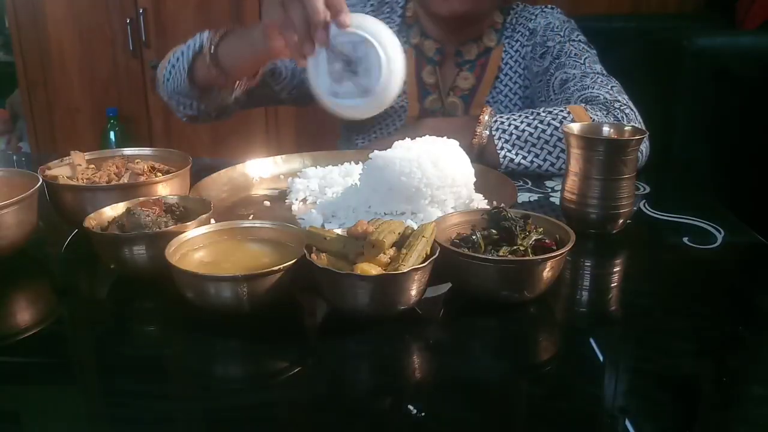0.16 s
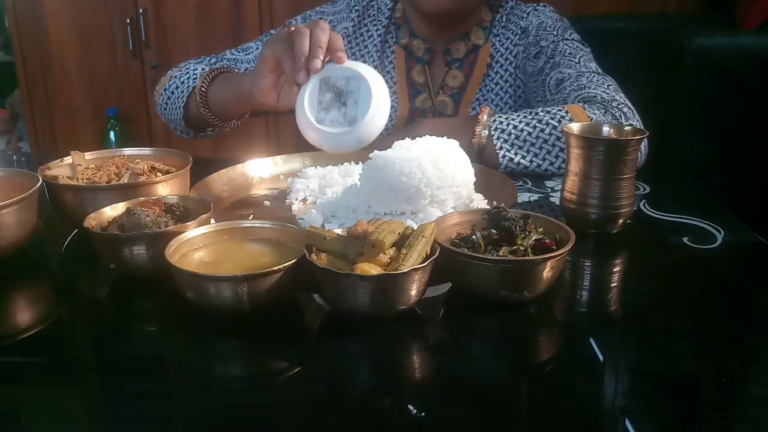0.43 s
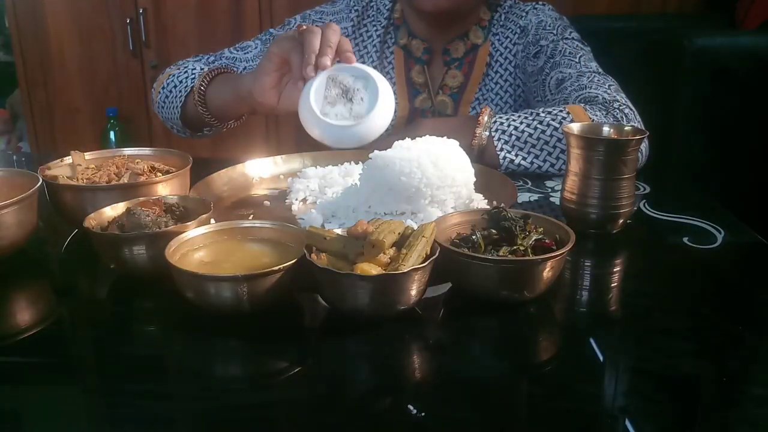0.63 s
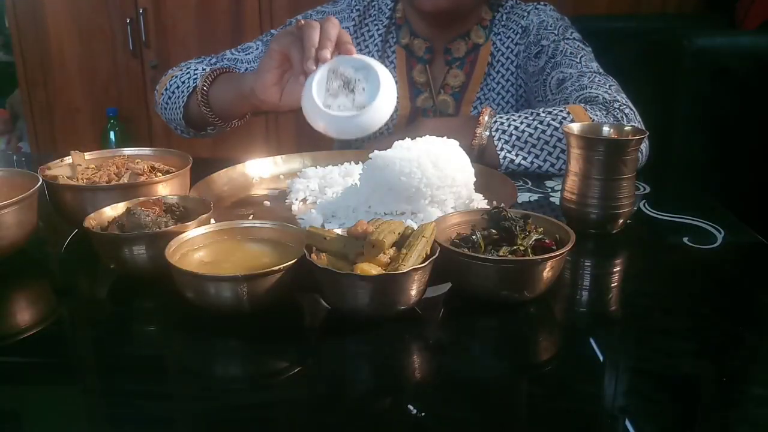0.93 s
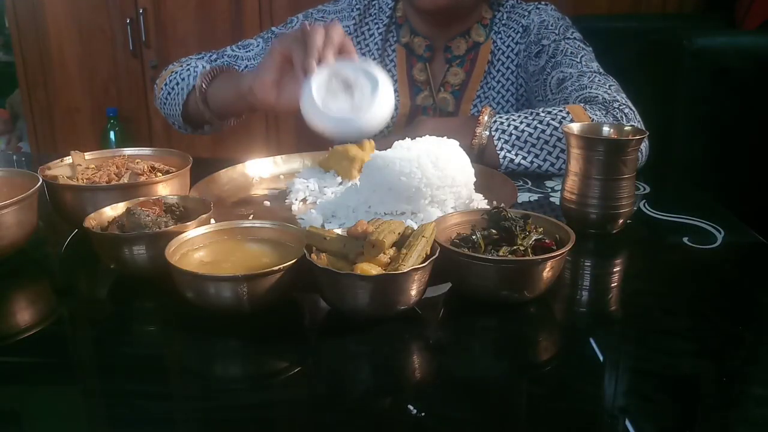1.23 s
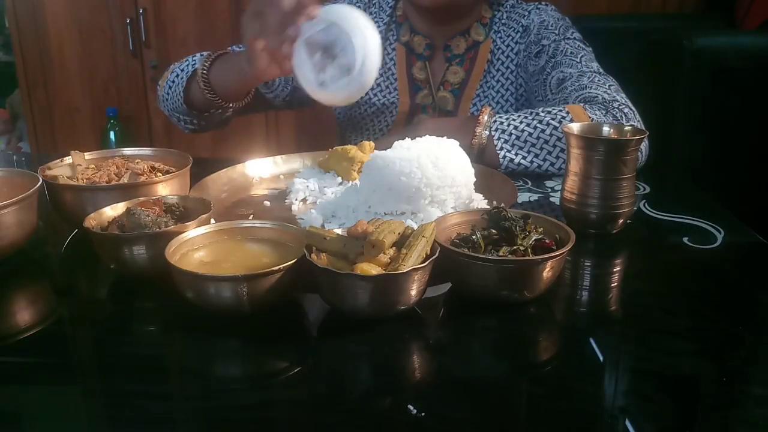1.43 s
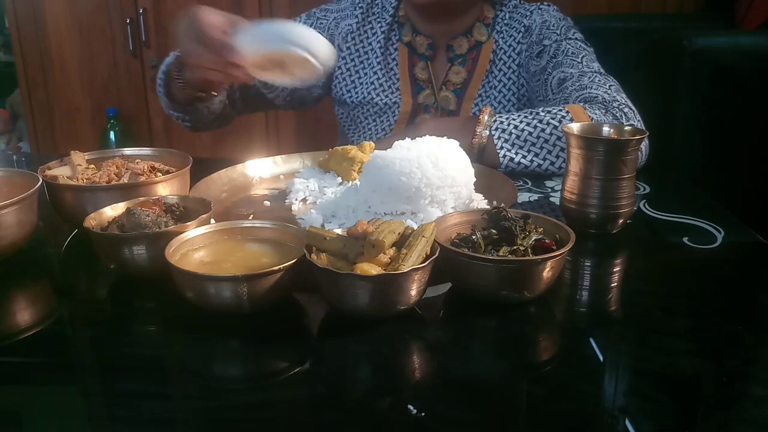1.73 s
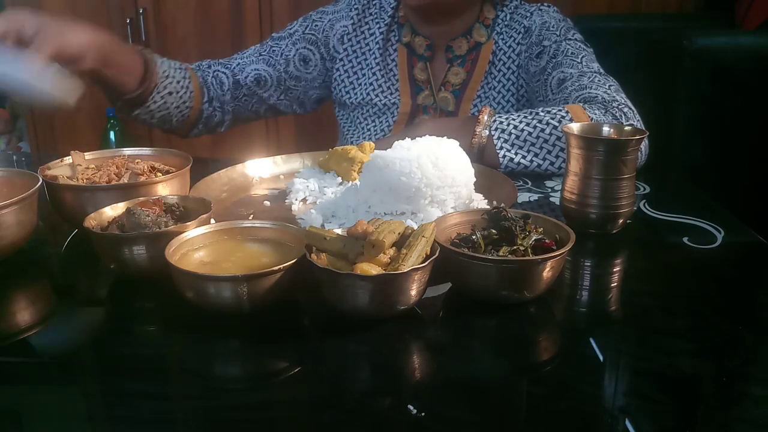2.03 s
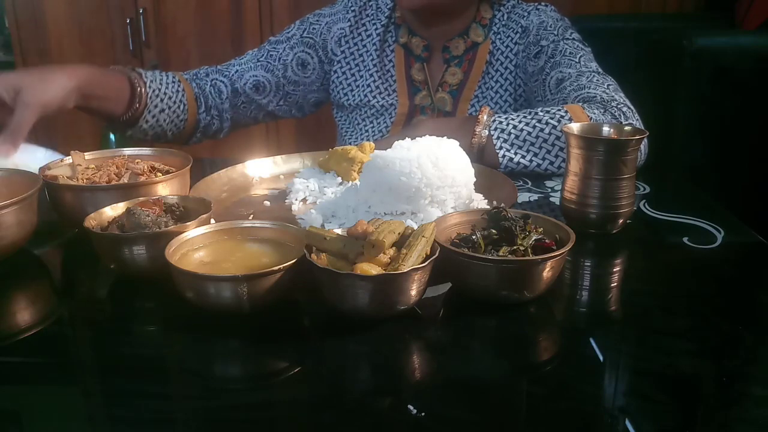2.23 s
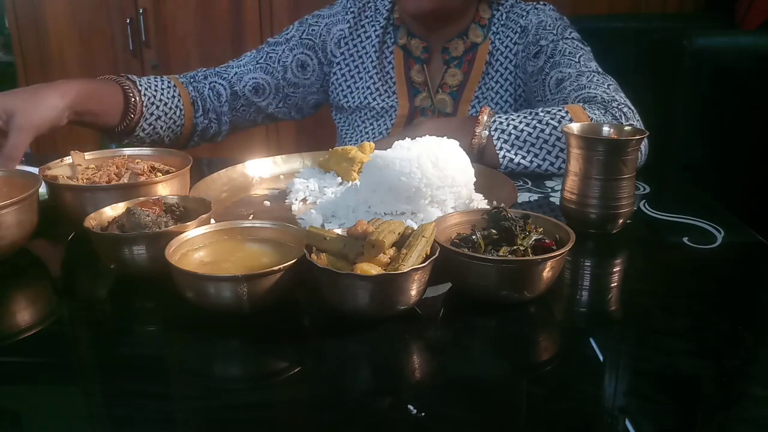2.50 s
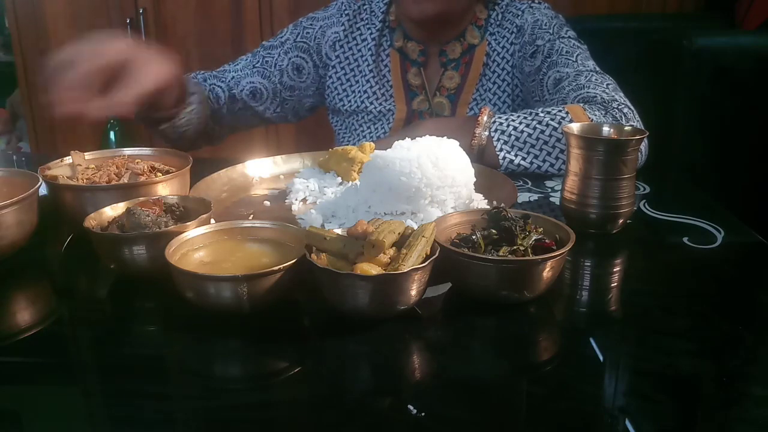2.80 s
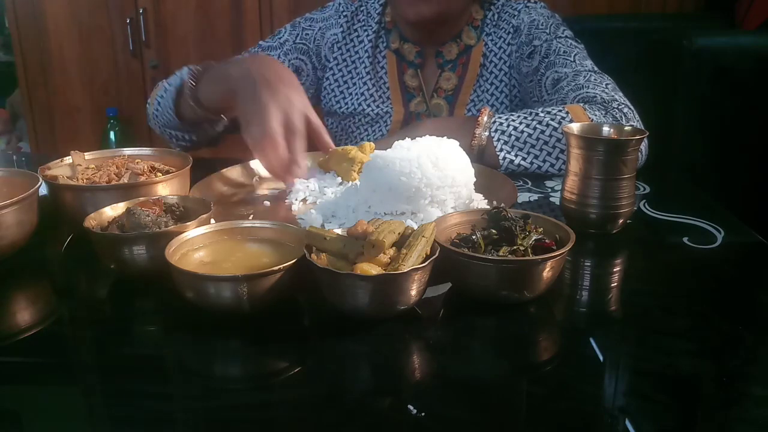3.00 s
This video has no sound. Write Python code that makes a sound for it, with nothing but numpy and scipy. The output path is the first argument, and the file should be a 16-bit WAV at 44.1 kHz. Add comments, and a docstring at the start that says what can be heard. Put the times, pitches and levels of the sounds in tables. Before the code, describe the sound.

A dish clinks on a metal bowl and clatters down, following the faint swishes, bumps and dull tap of food served by hand. A small, faintly humming room adds a short echo; the clatter distorts the microphone.

```python
"""An emptied dish clinks against a metal bowl, then clatters down among the bowls:
each hit is a sharp crack followed by a metallic ring. Before that, food is served by hand,
with soft swishes, low bumps on the table and a lump dropping dully on a metal plate.
The small, hard-walled room hums and adds a short echo. The clatter overloads the
microphone, whose gain control turns the sound down and recovers slowly."""
import sys
import numpy as np
from scipy import signal
from scipy.fft import rfft, irfft, next_fast_len
from scipy.io import wavfile
from scipy.ndimage import uniform_filter1d

SR = 44100
rng = np.random.default_rng(int(sys.argv[2]) if len(sys.argv) > 2 else 0)


def store_wav(level_fs):
    """Save 16-bit WAV to argv[1]."""
    pcm = np.round(np.clip(np.atleast_2d(level_fs), -1, 1) * 32767)
    wavfile.write(sys.argv[1], SR, pcm.T.astype(np.int16))


N = 138915
TIME = np.arange(N) / SR


def from_db(db):
    """Turn decibels into a number to multiply by."""
    return 10 ** (np.asarray(db) / 20)


def fade(t, fade_s):
    """A dying curve; the fade time is how long it takes to fall by 60 dB."""
    return np.exp(-np.log(1000) * t / fade_s)


def butter(order, hz, kind):
    """A filter that keeps the "low" part, the "high" part or a middle "band"."""
    return signal.butter(order, hz, kind, fs=SR, output="sos")


def at_hz(points, hz):
    """Read between a table's rows, giving every octave equal space."""
    row_hz, value = np.transpose(points)
    return np.interp(np.log(np.maximum(hz, 1)), np.log(row_hz), value)


def colour_gain(colour, size):
    """How strong each frequency is in a sound's colour, falling away past the table's ends."""
    hz = np.maximum(np.fft.rfftfreq(size, 1 / SR), 1)
    ends = np.minimum(hz / colour[0][0], 1) * np.minimum(colour[-1][0] / hz, 1)
    return from_db(at_hz(colour, hz)) * ends ** 2


def noise(colour):
    """Noise of the given colour, with an average power of 1."""
    size = next_fast_len(N)
    shaped = irfft(rfft(rng.standard_normal(size)) * colour_gain(colour, size), size)[:N]
    return shaped / np.sqrt(np.mean(shaped ** 2) + 1e-20)


def shortest_click(colour, size=4096):
    """The shortest click that has this colour."""
    cepstrum = irfft(np.log(colour_gain(colour, size) + 1e-9))
    half = size // 2
    cepstrum[1:half] *= 2   # folding the second half onto the first packs the energy at the start
    cepstrum[half + 1:] = 0
    click = irfft(np.exp(rfft(cepstrum)))[:half]
    return click / np.linalg.norm(click)


def through(x, response):
    """Pass a sound through something, given that thing's answer to one click."""
    return signal.fftconvolve(x, response)[:N]


def ring(hits, tones):
    """Every hit adds energy to each of an object's own tones, which then die away."""
    first = int(hits[0][0] * SR)
    t = TIME[:min(SR, N - first)]
    out = np.zeros(N)
    for hz, tone_db, fade_s in tones:
        energy = np.zeros(len(t))
        for start_s, hit_db, *_ in hits:
            lag = int(start_s * SR) - first
            energy[lag:] += (from_db(hit_db + tone_db) * fade(t[:len(t) - lag], fade_s)) ** 2
        out[first:first + len(t)] += rng.choice([-1, 1]) * np.sqrt(energy) * np.sin(2 * np.pi * hz * t)
    return out


# The colour of the room's noise. Each row: frequency in Hz, relative level in dB.
AIR_COLOUR = [(15, -43.5), (25, -14), (102, -2.5), (129, 0.5), (174, -7.5), (299, -11), (333, -13),
              (447, -18.5), (540, -11), (586, -14.5), (809, -17), (926, -18), (1390, -25.5), (2140, -33),
              (2870, -30.5), (9410, -45), (15700, -42.5)]
# The shape of its middle range's drift. Each row: time in seconds, level in dB before scaling.
MIDRANGE_DRIFT = [(0, -60.5), (.25, -60), (.62, -55.5), (.86, -59), (1.0, -56), (1.2, -54), (1.52, -62),
                  (1.68, -58), (2.15, -61), (2.36, -64)]

def room_noise(level_db=-51.5, drift_share=0.69):
    """Rumble and hiss whose middle range slowly rises and falls."""
    air = from_db(level_db) * noise(AIR_COLOUR)
    middle = signal.sosfiltfilt(butter(2, [460, 1500], "band"), air)
    drift_db = np.interp(TIME, *np.transpose(MIDRANGE_DRIFT))
    middle_gain = from_db(drift_share * (drift_db - np.median(drift_db)))
    return air + middle * (middle_gain - 1)


# The humming tones. Each row: pitch in Hz, relative level in dB.
HUM_TONES = [(145.3, -63.5), (543.7, -69), (899.0, -69.5), (1050, -72)]
# How their loudness wavers. Each row: speed in Hz, relative level in dB.
HUM_WAVER = [(1, 0), (10, -10)]

def hum(gain_db=-2, waver_depth=0.17):
    """A few faint tones, steady in pitch and slightly unsteady in loudness."""
    out = np.zeros(N)
    for hz, db in HUM_TONES:
        waver = 1 + waver_depth * noise(HUM_WAVER)
        tone = np.sqrt(2) * np.sin(2 * np.pi * (hz * TIME + rng.random()))
        out += from_db(db + gain_db) * waver * tone
    return out


# How long the room echoes. Each row: frequency in Hz, fade time in seconds.
ECHO_FADES = [(100, 0.095), (500, .25), (1500, 0.29), (3500, 0.3), (6000, 0.31), (9000, 0.24),
              (14000, 0.17)]

def room_echo(gap_s=0.0016, build_s=0.01, bands=9, size=32768):
    """The walls' answer to a click: reflections build up fast, then each band fades at its own pace."""
    t = TIME[:size]
    hz = np.fft.rfftfreq(size, 1 / SR)
    white = rfft(rng.standard_normal(size))
    centres = np.geomspace(80, 16000, bands)
    echo = np.zeros(size)
    for centre, share in zip(centres, np.eye(bands)):
        band = irfft(white * at_hz(list(zip(centres, share)), hz))
        echo += band * fade(t, at_hz(ECHO_FADES, centre))
    echo *= np.clip((t - gap_s) / build_s, 0, 1)
    return echo / np.linalg.norm(echo)


# Knocks from handling things. Each row: start in seconds, strength in dB.
KNOCKS = [(0.149, -1), (.388, -1.5), (1.324, -3.5), (1.645, -5.5)]
# The table's own tones. Each row: pitch in Hz, relative level in dB, fade time in seconds.
TABLE_TONES = [(83, -6, 0.17), (109.3, -1.5, .2), (179, -5.5, .15), (246, -5, .15)]

def table_bumps(gain_db=-41.5):
    """Soft knocks that the table turns into low thuds."""
    thuds = sum(ring([knock], TABLE_TONES) for knock in KNOCKS)
    return from_db(gain_db) * signal.sosfilt(butter(2, 400, "low"), thuds)


# Soft swishes, and a brief high rustle with a faint ring as a finger brushes the dish.
# Each row: start in seconds, level in dB, hold in seconds.
SWISH_STROKES = [(-.09, -53, .04), (.92, -48.5, 0.02), (1.92, -54, 0.031)]
RUSTLE_STROKES = [(1.09, -65, 0.014)]
# Their colours. Each row: frequency in Hz, relative level in dB.
SWISH_COLOUR = [(450, 5), (800, -9), (1500, -2.5), (2400, -8), (3200, -8.5), (4200, -8), (4900, -10.5),
                (5700, -9.5), (7000, -19.5), (8700, -25), (10000, -37)]
RUSTLE_COLOUR = [(3200, -18), (3950, 7), (4600, -12), (9000, -11), (15500, -15)]

def rubbing(strokes, colour, swell_s=0.027, fade_s=0.42):
    """Sliding makes a soft noise that swells, holds and dies away."""
    level = np.zeros(N)
    for start_s, db, hold_s in strokes:
        swell = np.clip((TIME - start_s) / swell_s, 0, 1)
        dying_s = np.maximum(TIME - start_s - swell_s - hold_s, 0)
        level += from_db(db) * swell * fade(dying_s, fade_s)
    return level * noise(colour)


# Food landing. Each row: start in seconds, strength in dB.
FOOD_HITS = [(1.2452, -1)]
# The loaded plate's brief tones. Each row: pitch in Hz, relative level in dB, fade time in seconds.
PLATE_TONES = [(670, -3, 0.033), (800, 3.5, 0.03), (1227, -5.5, 0.049), (1446, -1.5, 0.016),
               (2020, -12, 0.017), (2820, -13, 0.014)]

def food_drop(gain_db=-33.5, echo_db=-2.5):
    """A dull tap: the plate gives off little bass, and the soft food makes little treble."""
    plate = ring(FOOD_HITS, PLATE_TONES)
    tap = from_db(gain_db) * signal.sosfilt(butter(2, [500, 3000], "band"), plate)
    return tap + from_db(echo_db) * through(tap, room_echo())


def cracks(hits, colour, direct_db, echo_db, fade_s=0.034):
    """Each hit shakes so many short-lived tones that they blur into noise, and the room echoes it."""
    out = np.zeros(N)
    for start_s, db, bright_hz in hits:
        echo = room_echo()
        burst = rng.standard_normal(len(echo)) * fade(TIME[:len(echo)], fade_s)
        crack = from_db(direct_db) * burst / np.linalg.norm(burst) + from_db(echo_db) * echo
        crack = signal.sosfilt(butter(1, bright_hz, "low"), crack)
        start = int(start_s * SR)
        out[start:start + len(crack)] += from_db(db) * crack[:N - start]
    return through(out, shortest_click(colour))


# The dish touches a bowl and bounces. Each row: start in seconds, strength in dB, brightness in Hz.
CLINK_HITS = [(2.4365, 1.5, 15200), (2.4485, -4, 3500)]
# The colour of each crack. Each row: frequency in Hz, relative level in dB.
CLINK_COLOUR = [(150, -33), (400, -14.5), (850, -12.5), (1400, -7.5), (2000, -4.5), (2200, 5), (2400, -7.5),
                (2750, -5), (3600, -9), (3980, -2), (4300, -11), (4700, -18), (5600, -24), (6100, -8),
                (7000, -26), (9200, -18.5), (9900, -38.5), (11000, -39.5), (13000, -32.5), (15500, -43)]
# The tones that ring on. Each row: pitch in Hz, relative level in dB, fade time in seconds.
CLINK_TONES = [(868, -14.5, 0.37), (1431.5, -15, .25), (1863, -11.5, 0.37), (2165, 1, .2),
               (2640, -19.5, .26), (3553, -26, 0.19), (3903, -9, .33), (4060, -4, .26), (6067, -18.5, 0.43),
               (6550, -23.5, 0.21), (6560, -22.5, .25), (7900, -19.5, .26), (9000, -22.5, .23),
               (11840, -37, .22), (12970, -35.5, 0.25), (13060, -36.5, .22)]

def dish_clink(ring_db=-24.5):
    """A light touch of rim on rim: a crack, its echo and a short metallic ring."""
    crack = cracks(CLINK_HITS, CLINK_COLOUR, direct_db=6, echo_db=7)
    return crack + from_db(ring_db) * ring(CLINK_HITS, CLINK_TONES)


# The dish lands and rocks to rest. Each row: start in seconds, strength in dB, brightness in Hz.
CLATTER_HITS = [(2.672, 4, 15000), (2.6825, -3, 13920), (2.689, 1, 14050), (2.6995, -4, 10080),
                (2.7165, -16.5, 9000)]
# The colour of each crack. Each row: frequency in Hz, relative level in dB.
CLATTER_COLOUR = [(50, -33), (200, -27.5), (420, -17), (600, -14), (880, -10.5), (1050, -13), (1300, -8),
                  (2500, -5), (2800, -2), (3050, -4), (3600, -4.5), (4100, 0.5), (4500, -6.5), (5400, -8),
                  (6300, -5), (6850, -18.5), (8200, -13.5), (10500, -23), (13000, -19.5), (15500, -34.5)]
# The tones that ring on. Each row: pitch in Hz, relative level in dB.
CLATTER_TONES = [(275, -15), (385, -20.5), (450, -17), (594, -8), (870, -9.5), (1242, 0.5), (1949, 1),
                 (2697, -7.5), (2734, -1.5), (2780, 4), (2828, 1.5), (3173, 2.5), (3510, -10.5), (3701, -6),
                 (3747, -6), (3783, -1.5), (3960, -6), (4042, 2), (4147, -5), (4172, -0.5), (4868, 5),
                 (5466, -9), (5678, 0), (6089, -3.5), (6172, -3), (6315, -2), (8200, -15.5), (8888, -15),
                 (11770, -20), (12970, -23)]

def dish_clatter(ring_db=-25, fade_s=0.24):
    """The dish is put down hard: a quick run of hits shakes dish, bowls and table."""
    tones = [(hz, db, fade_s) for hz, db in CLATTER_TONES]
    crack = cracks(CLATTER_HITS, CLATTER_COLOUR, direct_db=15, echo_db=19)
    return crack + from_db(ring_db) * ring(CLATTER_HITS, tones)


def scene():
    """Everything in the room, added into one channel."""
    swishes = rubbing(SWISH_STROKES, SWISH_COLOUR)
    rustle = rubbing(RUSTLE_STROKES, RUSTLE_COLOUR)
    background = room_noise() + hum()
    serving = table_bumps() + swishes + rustle + food_drop()
    return (background + serving + dish_clink() + dish_clatter())[None]


def gain_control(x, limit_db=-12, cut_share=0.6, react_s=0.15, recover_db_per_s=7):
    """Sound above the limit turns the volume down; it then creeps back up."""
    power = uniform_filter1d(x ** 2, size=441)   # averaged over 10 ms
    level_db = 10 * np.log10(np.maximum(power, 1e-12))
    cut_db = cut_share * np.maximum(level_db - limit_db, 0)
    recovery_db = recover_db_per_s * TIME
    held_db = np.maximum.accumulate(cut_db + recovery_db, axis=-1) - recovery_db
    smoothing = np.exp(-1 / (react_s * SR))
    return x * from_db(-signal.lfilter([1 - smoothing], [1, -smoothing], held_db))


def record(dry, lowest_hz=26, highest_hz=15800):
    """The microphone drops deep rumble, turns loud sound down, clips peaks and cuts the top treble."""
    heard = signal.sosfilt(butter(2, lowest_hz, "high"), dry)
    clipped = np.clip(gain_control(heard), -1, 1)
    return signal.sosfilt(signal.ellip(10, .1, 70, highest_hz, fs=SR, output="sos"), clipped)


dry = scene()
out = record(dry)
store_wav(out)
```